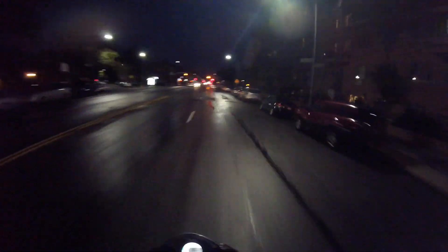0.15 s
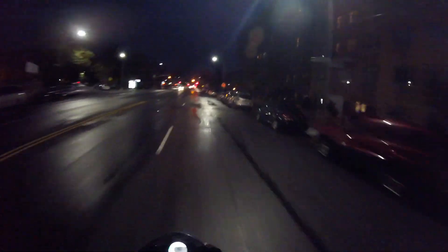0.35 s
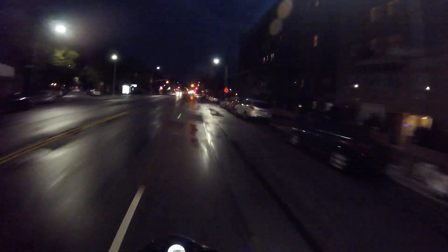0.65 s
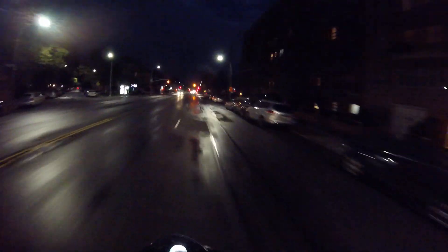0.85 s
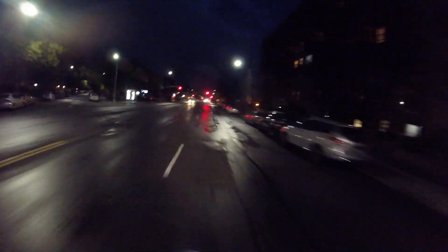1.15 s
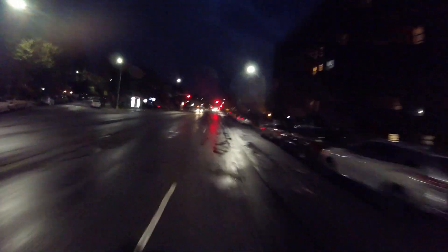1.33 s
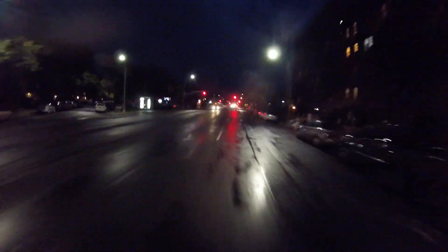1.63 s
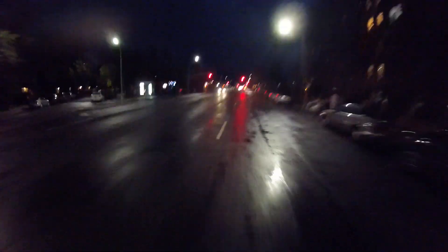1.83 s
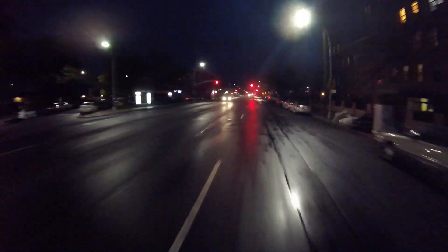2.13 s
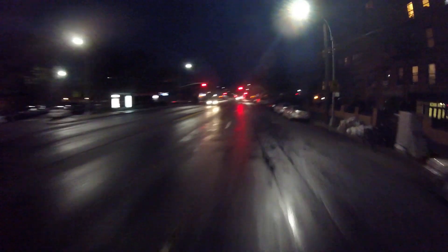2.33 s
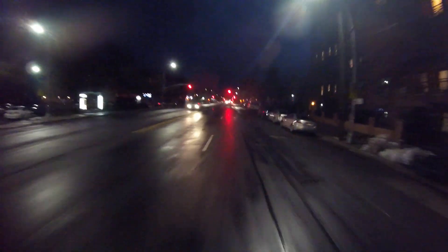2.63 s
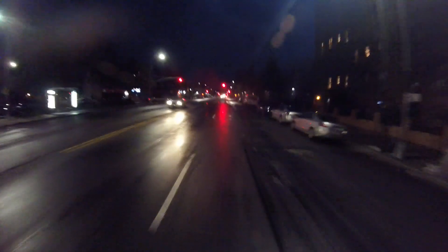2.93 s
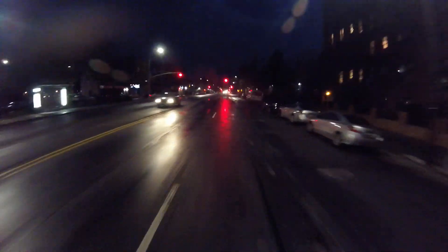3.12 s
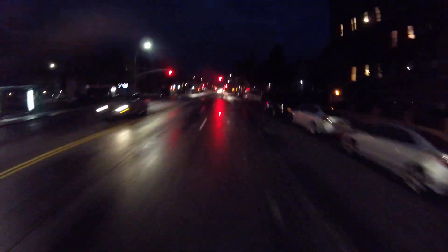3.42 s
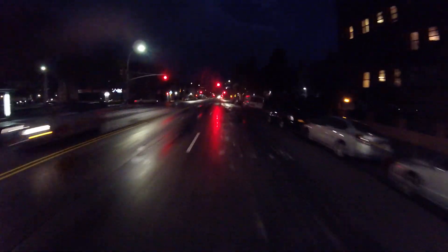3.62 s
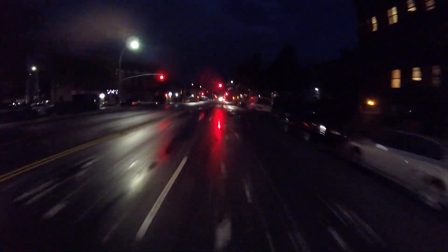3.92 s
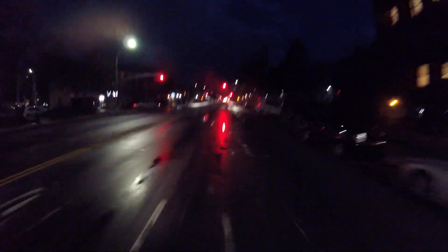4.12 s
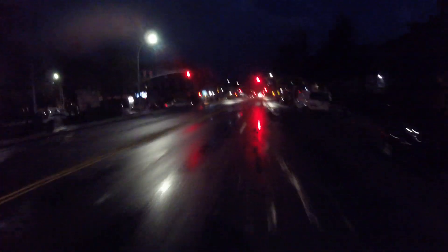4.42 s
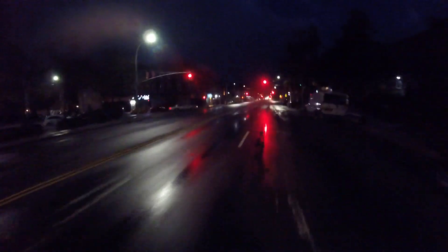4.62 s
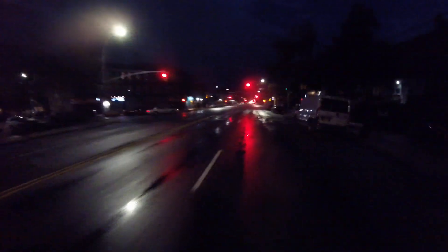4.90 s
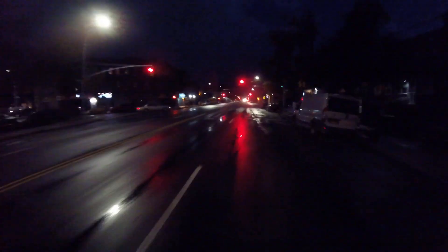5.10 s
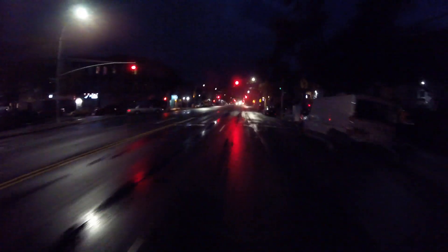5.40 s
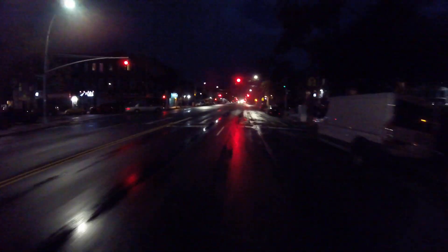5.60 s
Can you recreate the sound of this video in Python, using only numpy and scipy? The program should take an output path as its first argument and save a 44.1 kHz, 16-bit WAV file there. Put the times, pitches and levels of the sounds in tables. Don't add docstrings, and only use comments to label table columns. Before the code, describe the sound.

Heard from a sealed case mounted on a motorcycle, a deep smooth engine drone slowly falls in pitch, then drops quickly into a short uneven idle. A sharp rev blip follows into a lower gear, and the drone slides down again with more upper tones. Wind buffets and roars, tyres hiss on the wet street, and dull bumps knock the mount. Close, dark, muffled sound.

```python
import sys
import numpy as np
from scipy import signal
from scipy.io import wavfile

SR = 44100
rng = np.random.default_rng(int(sys.argv[2]) if len(sys.argv) > 2 else 0)


def bounce(signal):
    frames = np.transpose(np.atleast_2d(signal))
    limited = np.clip(frames, -1, 1)
    pcm = np.round(limited * 32767).astype(np.int16)
    wavfile.write(sys.argv[1], SR, pcm)


def boost_factor(decibels):
    exponent = np.asarray(decibels, float) / 20
    return 10 ** exponent


N = 253575
T_S = np.arange(N) / SR

# (time [s], level [dB])
WIND = [(0.0, -24.5), (0.3, -29.5), (0.55, -25.5), (1.0, -30), (1.22, -27), (1.45, -33.5), (1.8, -28.5),
        (2.25, -32), (2.6, -31.5), (2.8, -27), (3.0, -28), (3.45, -28.5), (3.6, -25), (3.9, -24.5),
        (4.2, -27), (4.6, -33), (5.2, -33.5), (5.75, -34.5)]
# (time [s], rise [dB], length [s])
GUSTS = [(0.17, 9, 0.1), (0.35, 11.5, 0.047), (0.49, 10, 0.14), (0.63, 5, 0.087), (1.0, 7, 0.21),
         (1.21, 10, .1), (1.34, 10, 0.073), (1.5, 10.5, 0.27), (1.72, 13.5, 0.15), (1.88, -0.5, 0.1),
         (2.15, 10.5, 0.054), (2.28, 5, 0.053), (2.8, 3, 0.054), (3.02, 2, 0.11), (3.25, 3, 0.2),
         (3.47, 3, 0.19), (3.63, 7.5, 0.1), (3.92, 5, .09), (4.2, 6.5, 0.16), (4.37, 11, .07),
         (4.68, 7.5, 0.25), (5.11, 7, .12), (5.5, 7, 0.23), (5.68, 12, 0.088)]
# (time [s], change [dB], length [s])
SURGES = [(0.1, 0.5, .1), (0.52, -6.5, 0.078), (0.68, -2.5, 0.055), (0.83, 3, 0.084), (1.23, 4, .08),
          (1.48, 2, 0.061), (1.93, 2.5, 0.068), (2.88, 1.5, 0.045), (3.01, 4, 0.088), (3.68, -2.5, 0.044),
          (3.88, 5, .05), (4.25, -4, .1), (4.6, -2, 0.087), (4.83, 4, .07), (5.44, 3.5, .06),
          (5.7, -1.5, 0.083)]
# (frequency [Hz], density [dB per Hz])
BUFFET_SPECTRUM = [(15, -10.5), (30, -0.5), (60, 0.5), (90, -6), (140, -3), (220, -11.5)]
# (frequency [Hz], density [dB per Hz])
ROAR_SPECTRUM = [(45, -15.5), (80, 1.5), (150, -3), (250, -1.5), (350, -5), (520, -8.5), (700, -21.5),
                 (1000, -40.5)]
# (time [s], level [dB])
WATER = [(0.0, -33.5), (0.5, -36), (1.36, -33.5), (1.55, -35), (1.75, -39), (2.0, -37), (2.7, -35),
         (3.1, -37.5), (3.5, -36.5), (3.62, -32.5), (3.85, -38), (4.25, -39.5), (4.43, -45), (5.38, -47),
         (5.75, -48.5)]
# (time [s], change [dB], length [s])
PATCHES = [(0.27, 4, .1), (0.38, -3, .06), (1.62, -3.5, .05), (1.83, -6, 0.067), (2.85, 0, 0.25),
           (4.2, 2, 0.093), (4.31, -3.5, 0.023), (4.37, 2, 0.033), (3.62, -0.5, 0.041), (4.96, 2, .05),
           (5.5, 3, 0.14)]
# (frequency [Hz], density [dB per Hz])
SPRAY_SPECTRUM = [(250, -10), (450, 1.5), (700, 2.5), (1000, 1), (1500, -4), (2200, -7.5), (2900, -11),
                  (3600, -20.5), (4400, -36.5), (5600, -40)]
# (frequency [Hz], width [Hz], level [dB])
CAVITY = [(3400, 510, 0.5), (4950, 470, 0.5), (5295, 560, -1), (6485, 230, 1), (6730, 660, -6.5),
          (7600, 600, -27)]
# (firing rate [Hz], level [dB])
VALVE_GEAR = [(62, -62.5), (88, -60.5), (102, -60), (112, -61.5), (122, -59), (130, -55), (137, -58.5)]
# (time [s], peak [dB])
KNOCKS = [(0.197, -32), (0.637, -14), (0.977, -18), (1.136, -22), (1.326, -23), (1.673, -16),
          (1.715, -17.5), (2.929, -17.5), (3.455, -32), (3.494, -12), (3.532, -31), (3.581, -27),
          (3.622, -35), (3.882, -13.5), (4.042, -21), (4.138, -23), (4.278, -22), (4.359, -14.5),
          (4.948, -24), (5.117, -29), (5.451, -23), (5.493, -18.5), (5.546, -25), (5.583, -18.5)]
# (time [s], peak [dB])
LATCH_TICKS = [
    (1.717, -44),
    (3.884, -31),
    (1.675, -50),
    (1.14, -50),
    (1.53, -50),
]
# (time [s], peak [dB], swing [Hz])
ROAD_JOINTS = [(0.806, -19, 110.6), (1.135, -10, 127.6), (1.183, -34, 91.6), (1.708, -12, 83.3),
               (1.763, -10.5, 134), (3.044, -17.5, 80.2), (3.451, -6.5, 111.1), (3.58, -5, 73.5),
               (3.88, -5, 170), (5.34, -7, 100), (5.667, -29, 80.2)]
# (time [s], firing rate [per s], effort [dB])
IDLE = [
    (3.05, 60, -58.5),
    (3.08, 52, -29),
    (3.15, 50, -34.5),
    (3.25, 43, -34),
    (3.35, 44, -29.5),
    (3.44, 48, -31),
    (3.5, 38, -29),
    (3.57, 28, -24),
    (3.62, 40, -63.5),
]
# (time [s], firing rate [Hz], drone [dB])
IN_GEAR = [
    [(0.0, 137.1, -18), (0.42, 133.2, -16.5), (1.31, 124.6, -16), (2.38, 113.7, -16), (2.69, 110.9, -14.5),
     (2.76, 103.5, -14.5), (2.88, 88.5, -18.5), (3.04, 63.2, -22.5), (3.07, 60.7, -31)],
    [(3.575, 68.35, -30), (3.59, 72.89, -19), (3.69, 93.1, -14.5), (3.8, 116.3, -11.5),
     (3.86, 124.3, -18.5), (3.9, 120.9, -16), (4.55, 112, -15), (5.12, 98.72, -15), (5.75, 84.76, -17)],
]
# (multiple [1], level re drone [dB], phase lead [rad])
HARMONICS = [(1, 0, 0.4), (1.5, -29, 0.04), (2.5, -28.5, 2.5), (3, -29.5, -0.27), (4, -33, -0.8),
             (5, -37.5, 0.4)]
# (frequency [Hz], width [Hz], lift [dB])
FRAME = [(230, 19, 7.5), (386.7, 31.8, 13.5), (533, 15, 14)]
# (firing rate [Hz], level re drone [dB])
SECOND_GAIN = [(62, -5.5), (88, -13), (105, -10.5), (122, -8.5), (137, -10.5)]
# (firing rate [Hz], phase lead [rad])
SECOND_LEAD = [(85, .4), (100, .9), (112, 1.4), (126, 1.5), (138, .4)]
# (time [s], change [dB], length [s])
CANCELS = [
    (0.22, -17, 0.11),
    (0.55, -13, 0.11),
    (0.91, -13.5, 0.049),
    (1.71, -10.5, 0.095),
    (2.88, -5, 0.104),
    (3.83, -26, .07),
    (4.82, -11, .16),
]


def in_time(rows):
    s, *columns = np.transpose(rows)
    return [np.interp(T_S, s, column) for column in columns]


def at_rate(firing_hz, rows):
    return np.interp(firing_hz, *np.transpose(rows))


def swells(rows):
    return sum(db * np.exp(-(2 * (T_S - s) / length_s) ** 2) for s, db, length_s in rows)


def rms_one(x):
    return x / np.sqrt(np.mean(x ** 2) + 1e-20)


def drift(rate_hz):
    r = np.exp(-40 * np.pi * rate_hz / SR)
    white = rng.standard_normal(N // 20 + 2002)
    slow = signal.lfilter([1], [1, -2 * r, r * r], white)[2000:]
    return np.interp(np.arange(N) / 20, np.arange(len(slow)), rms_one(slow))


def resonate(x, hz, width_hz):
    r = np.exp(-np.pi * width_hz / SR)
    poles = [1, -2 * r * np.cos(2 * np.pi * hz / SR), r * r]
    return signal.lfilter([(1 - r * r) / 2, 0, (r * r - 1) / 2], poles, x)


def soften(x, cut_hz):
    return signal.sosfilt(signal.butter(4, cut_hz, fs=SR, output="sos"), x)


def turbulence(spectrum, shared_db, own_db, rate_hz):
    hz, db = np.transpose(spectrum)
    edges_hz = hz[0] * 2 ** np.arange(0, np.log2(hz[-1] / hz[0]), 1 / 4)
    white = rng.standard_normal((2, N))
    together = drift(rate_hz)
    out = 0
    for k, (low, high) in enumerate(zip(edges_hz, edges_hz[1:])):
        sos = signal.butter(2, [low, high], "band", fs=SR, output="sos")
        band = signal.sosfilt(sos, white[k % 2])
        level_db = np.interp(np.log(low * high) / 2, np.log(hz), db)
        out = out + band * boost_factor(level_db + shared_db * together + own_db * drift(rate_hz / 2))
    return rms_one(out)


def eddies():
    sizes = boost_factor(3.1 * np.minimum(rng.exponential(1, N), 4)) * rng.choice([-1, 1], N)
    pops = (rng.random(N) < 160 / SR) * sizes + 1e-18
    kind = rng.integers(0, 3, N)
    swings = [(69.4, 74, 5), (170, 220, -0.5), (426, 360, -3.5)]  # (frequency [Hz], width [Hz], level [dB])
    out = 0
    for k, (hz, width_hz, db) in enumerate(swings):
        out = out + boost_factor(db) * rms_one(resonate(pops * (kind == k), hz, width_hz))
    return rms_one(soften(out, 900))


def wind():
    wind_db, = in_time(WIND)
    gust_db = swells(GUSTS)
    buffet_db = -36 + 0.33 * (wind_db - wind_db.mean()) + gust_db
    roar_db = wind_db + 0.25 * gust_db + swells(SURGES)
    out = boost_factor(buffet_db + 4.5) * turbulence(BUFFET_SPECTRUM, shared_db=0.0, own_db=-0.1, rate_hz=6.5)
    out += boost_factor(roar_db + 2.0) * turbulence(ROAR_SPECTRUM, shared_db=1.5, own_db=0.0, rate_hz=26)
    return out + boost_factor(roar_db - 4.5) * eddies()


def wet_road():
    water_db, = in_time(WATER)
    spray_db = water_db + swells(PATCHES)
    return boost_factor(spray_db + 3.5) * turbulence(SPRAY_SPECTRUM, shared_db=1.01, own_db=0.14, rate_hz=25)


def clatter():
    firing_hz, _ = running()
    level_db = at_rate(firing_hz, VALVE_GEAR) + 0.66 * swells(PATCHES)
    sizes = boost_factor(1.7 * np.minimum(rng.exponential(1, N), 5)) * rng.choice([-1, 1], N)
    ticks = (rng.random(N) < 5000 / SR) * sizes
    ticks = ticks * boost_factor(1.0 * drift(25))
    rings = 0
    for hz, width_hz, db in CAVITY:
        once = resonate(ticks, hz, width_hz * 1.7)
        rings = rings + boost_factor(db) * resonate(once, hz, width_hz * 1.7)
    return boost_factor(level_db) * rms_one(rings)


def thumps():
    out = np.zeros(N)
    age_s = np.arange(int(0.062 * SR)) / SR
    for s, peak_db, hz in ROAD_JOINTS:
        fade = np.exp(-0.9 * hz * age_s) * np.minimum(age_s / 0.0033, 1)
        swing = np.sin(2 * np.pi * hz * age_s) * fade
        start = int(s * SR)
        out[start:][:len(age_s)] += boost_factor(peak_db - 1.0) * swing[:N - start]
    return soften(out, 700)


def knocks():
    s, peak_db = np.transpose(KNOCKS)
    hit, tick = np.zeros(N), np.zeros(N)
    hit[(s * SR).astype(int)] = boost_factor(peak_db)
    tick_s, tick_db = np.transpose(LATCH_TICKS)
    tick[(tick_s * SR).astype(int)] = boost_factor(tick_db)
    hit = hit + 1e-18
    dying = signal.lfilter([1], [1, -np.exp(-1 / (0.0032 * SR))], hit)
    rattle_spectrum = [(250, 12.0), (800, -7.5), (2500, -16.5), (4000, -22)]  # (frequency [Hz], density [dB per Hz])
    rattle = soften(dying * turbulence(rattle_spectrum, 0, 0, 10), 2200)
    jolt = soften(resonate(hit, 600, 500) - 0.5 * resonate(hit, 1100, 860), 1700)
    return boost_factor(-6) * rattle + boost_factor(22) * jolt + tick


def idle():
    per_s, effort_db = in_time(IDLE)
    turns = np.cumsum(per_s * boost_factor(0.35 * drift(12))) / SR
    firings = np.diff(np.floor(turns), prepend=0)
    pulses = soften(firings * boost_factor(4.0 * drift(26)) + 1e-18, 300)
    thud = rms_one(resonate(pulses, 87, 130))
    hum = np.sqrt(2) * boost_factor(2.4 * drift(7.9)) * np.cos(4 * np.pi * turns)
    return boost_factor(effort_db - 4) * thud + boost_factor(effort_db + 2) * hum


def running():
    before, after = IN_GEAR
    gap = [(before[-1][0] + 0.02, before[-1][1], -60), (after[0][0] - 0.005, after[0][1], -60)]
    return in_time(list(before) + gap + list(after))


def engine():
    firing_hz, drone_db = running()
    clutch_in_s, lower_gear_s = IN_GEAR[0][-1][0], IN_GEAR[1][0][0]
    turn = 2 * np.pi * np.cumsum(firing_hz) / SR + 0.0072 * drift(24)
    turn = turn - 2.9 + 2.4 * (T_S > clutch_in_s + 0.1)
    second_db = drone_db + at_rate(firing_hz, SECOND_GAIN) + swells(CANCELS)
    out = boost_factor(second_db) * np.cos(2 * turn + at_rate(firing_hz, SECOND_LEAD))
    for multiple, db, lead_rad in HARMONICS:
        lift_db = 0
        for hz, width_hz, top_db in FRAME:
            lift_db = lift_db + top_db / (1 + ((multiple * firing_hz - hz) / width_hz) ** 2)
        lift_db = lift_db - 7 * (multiple > 2.5) * (T_S < lower_gear_s)
        unsteady_db = min(0.5 * multiple, 1.0) * drift(10)
        out = out + boost_factor(drone_db + db + lift_db + unsteady_db) * np.cos(multiple * turn + lead_rad)
    return np.sqrt(2) * out


def scene():
    return (wind() + wet_road() + clatter() + thumps() + knocks() + idle() + engine())[None]


def roll_off(x):
    return signal.sosfilt(signal.butter(12, 9500, fs=SR, output="sos"), x)


def record(dry):
    ceiling = 0.96
    x = dry - 0.65 * resonate(dry, hz=5990, width_hz=680)
    x = ceiling * np.tanh(1.035 * x / ceiling)
    x = soften(x, 7800)
    return roll_off(x)


dry = scene()
out = record(dry)
bounce(out)
```